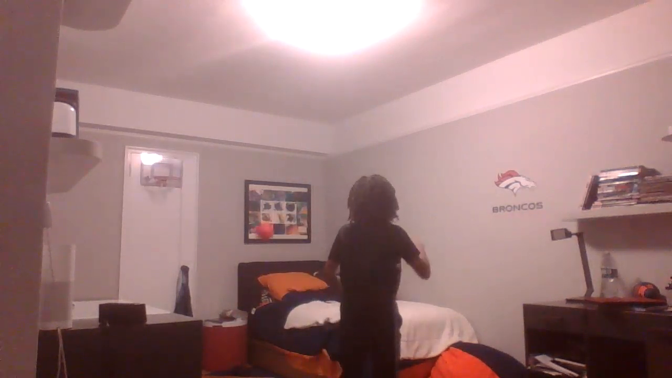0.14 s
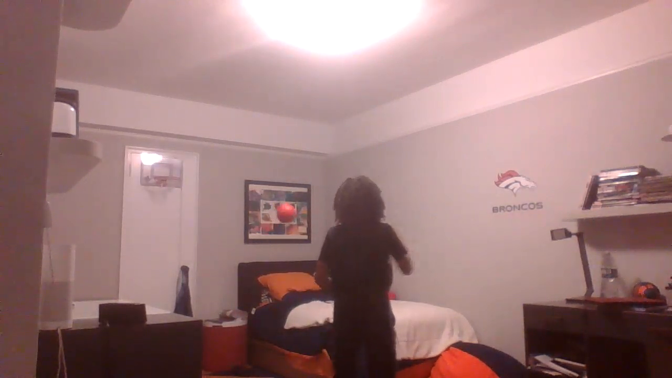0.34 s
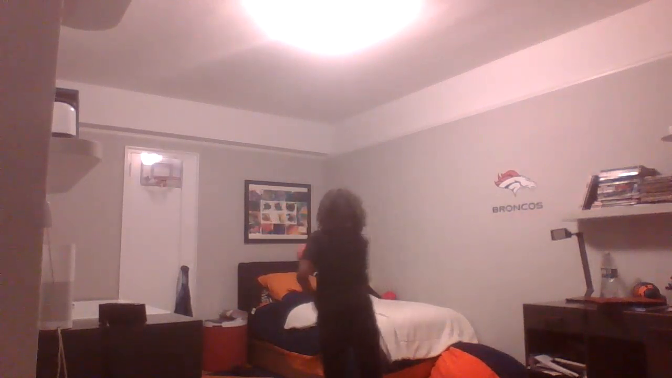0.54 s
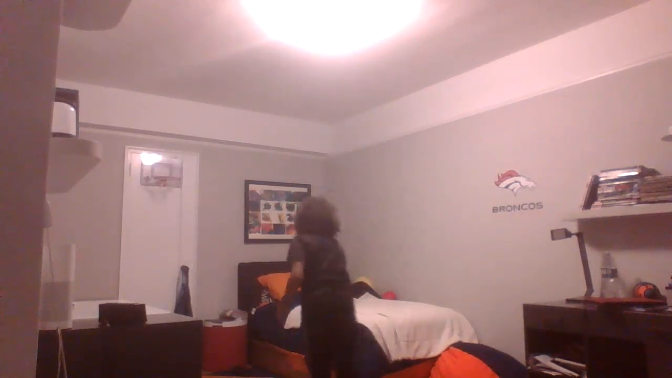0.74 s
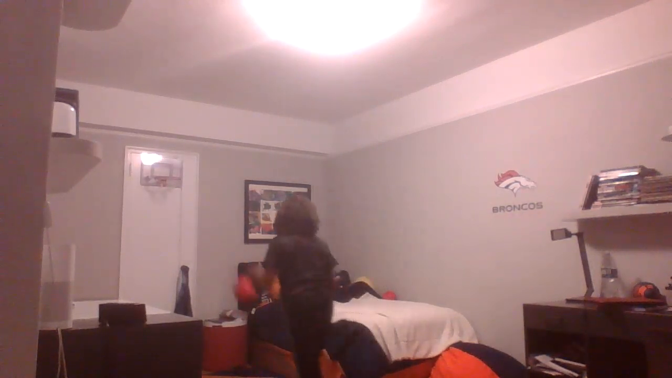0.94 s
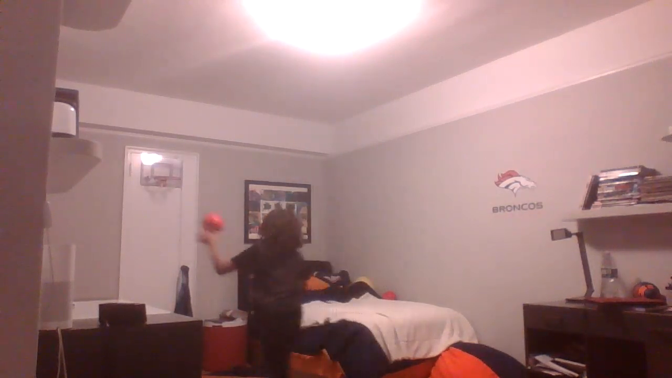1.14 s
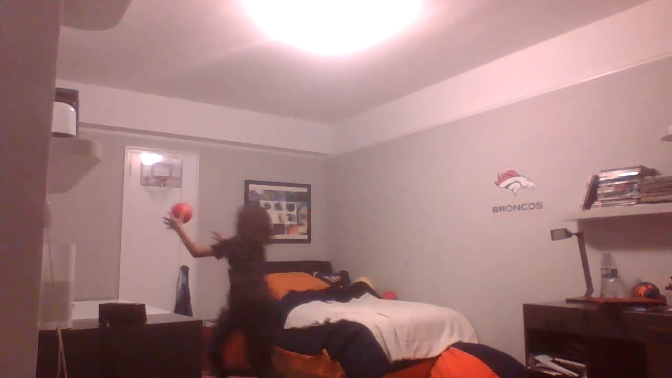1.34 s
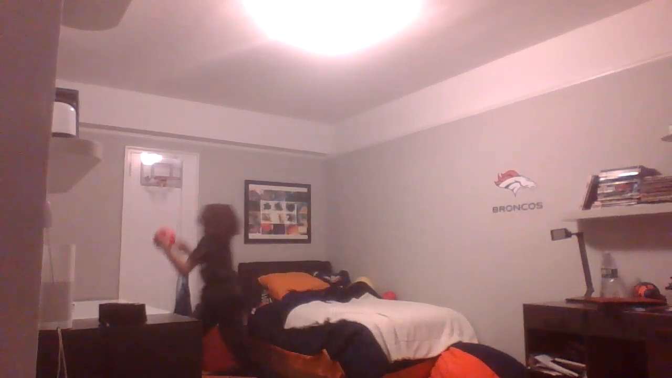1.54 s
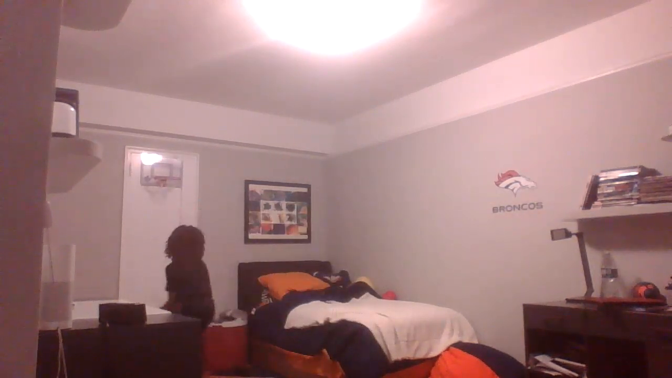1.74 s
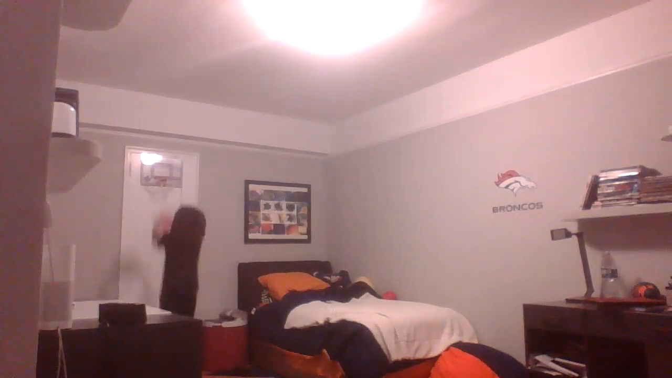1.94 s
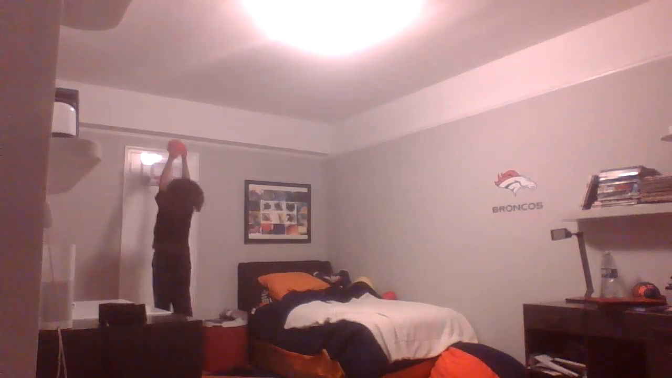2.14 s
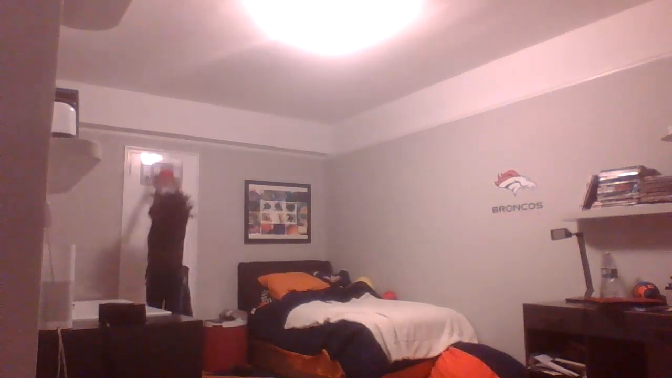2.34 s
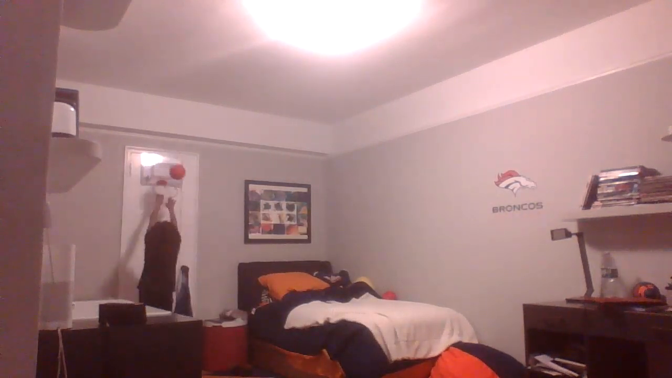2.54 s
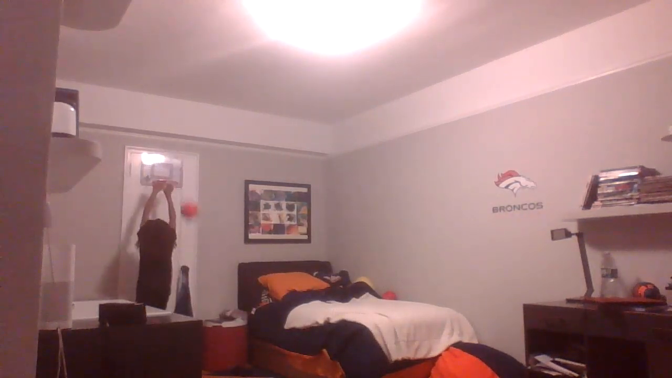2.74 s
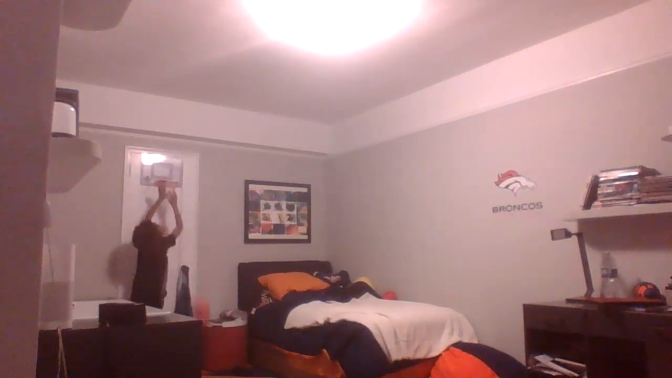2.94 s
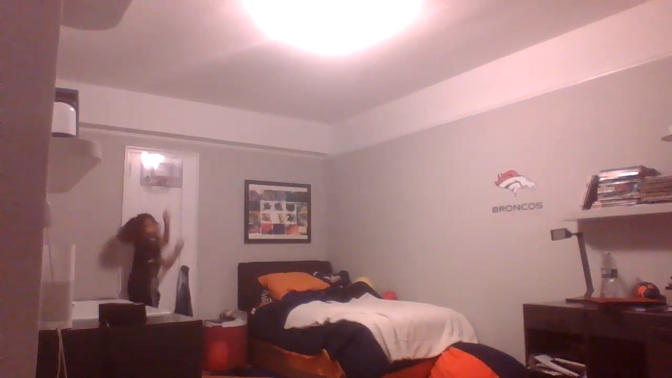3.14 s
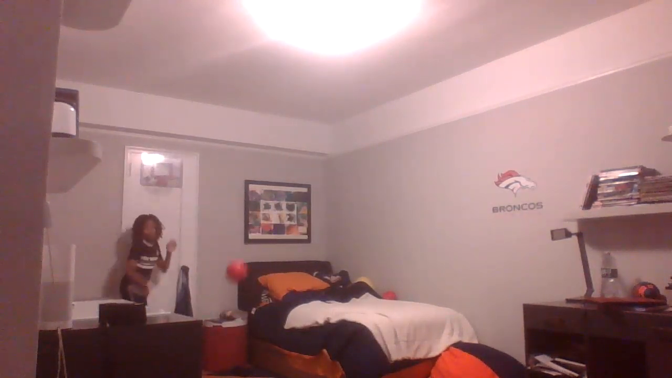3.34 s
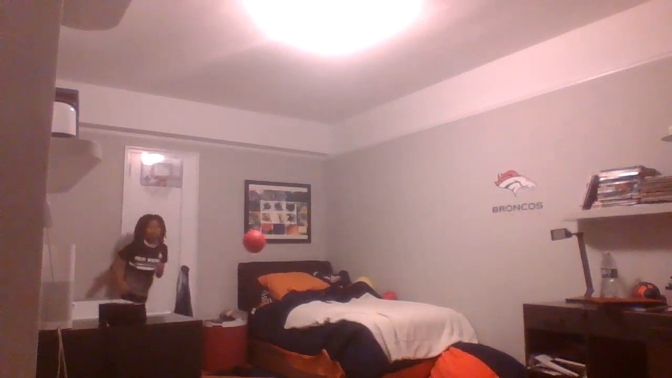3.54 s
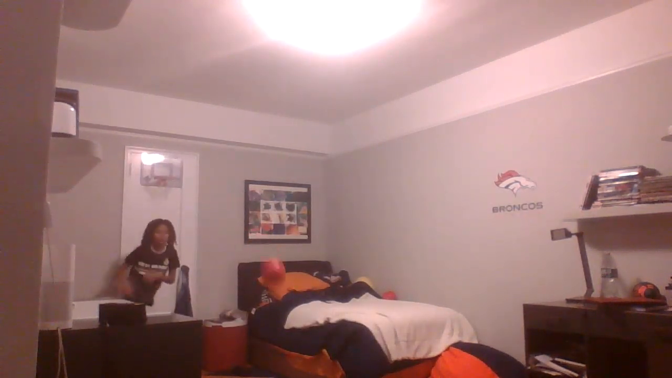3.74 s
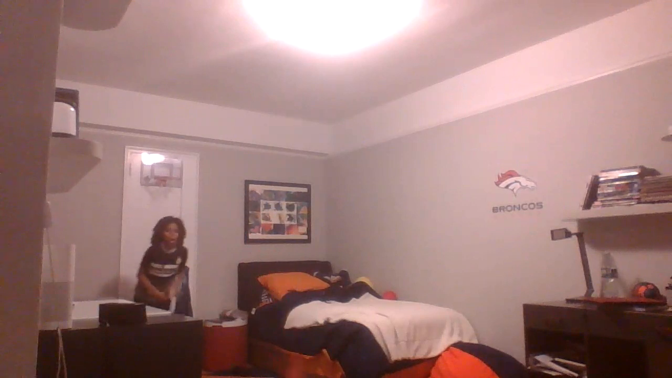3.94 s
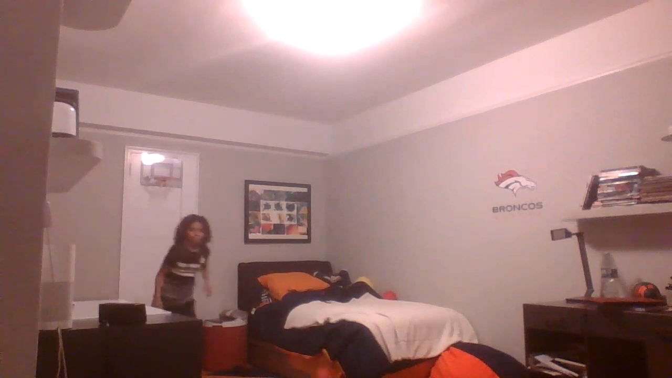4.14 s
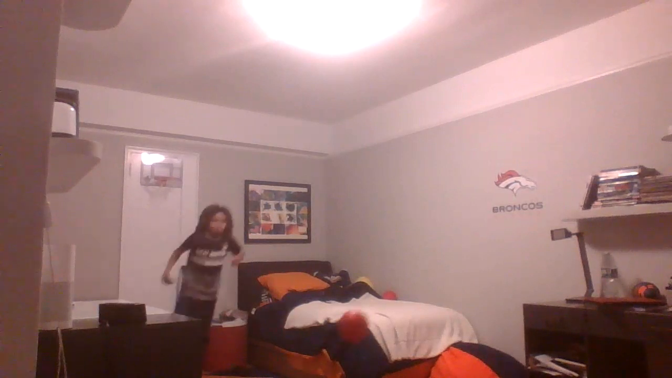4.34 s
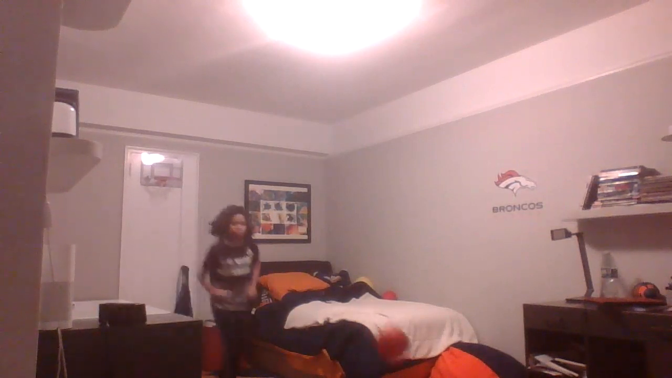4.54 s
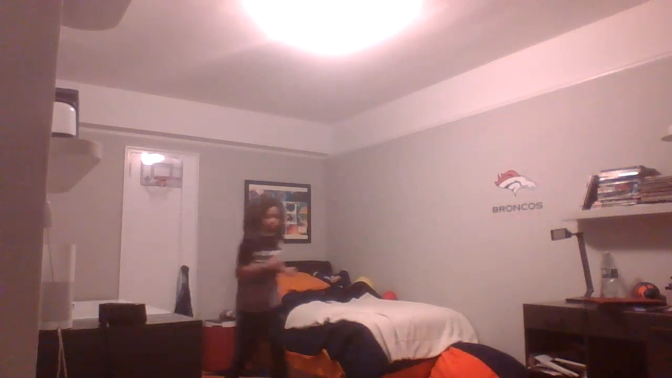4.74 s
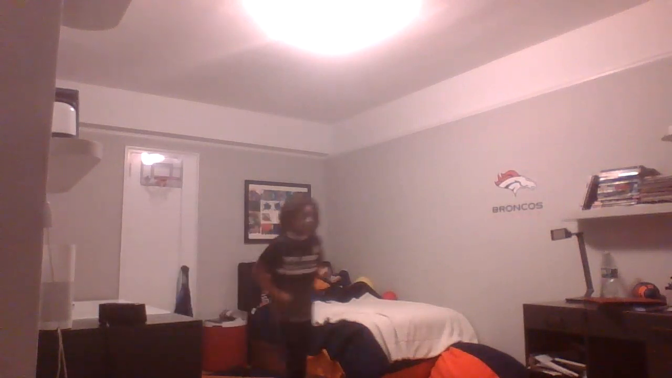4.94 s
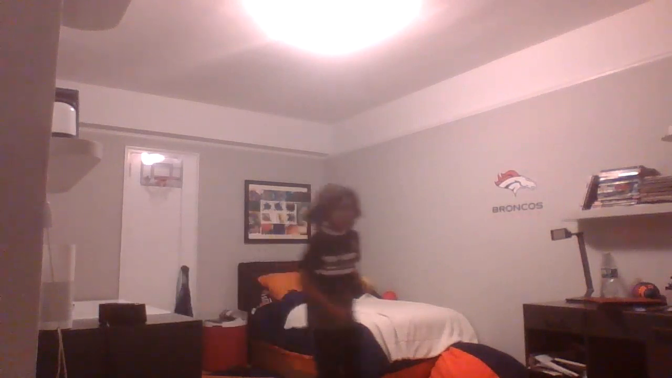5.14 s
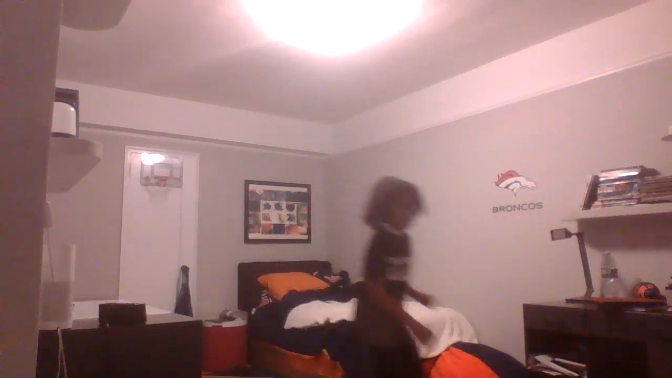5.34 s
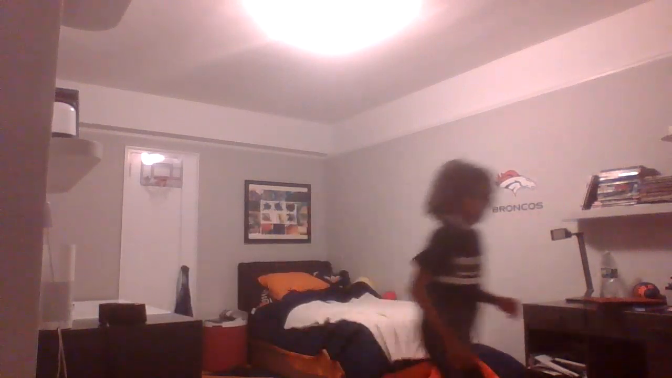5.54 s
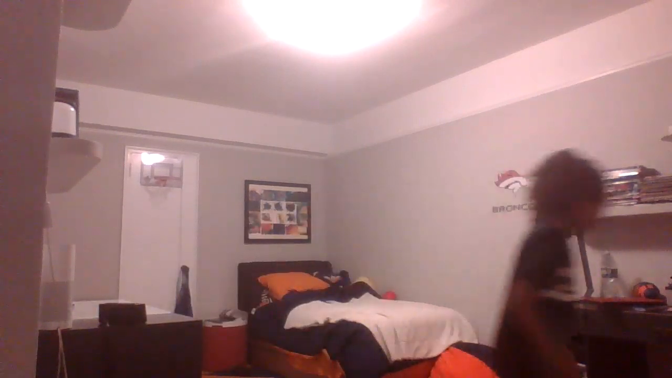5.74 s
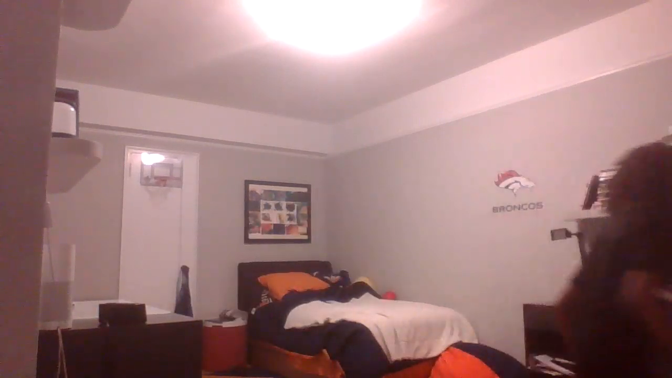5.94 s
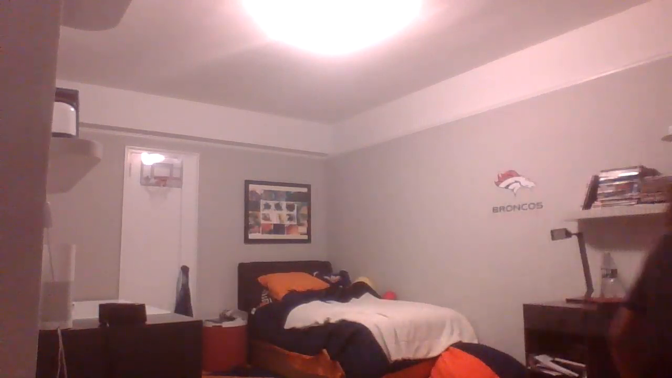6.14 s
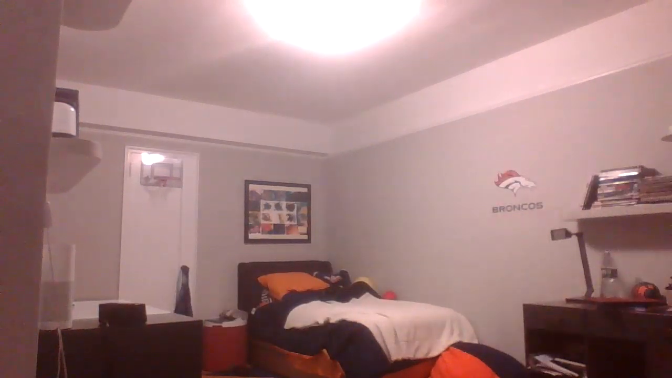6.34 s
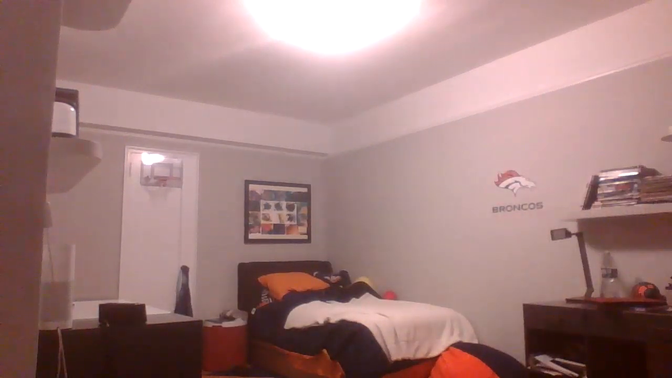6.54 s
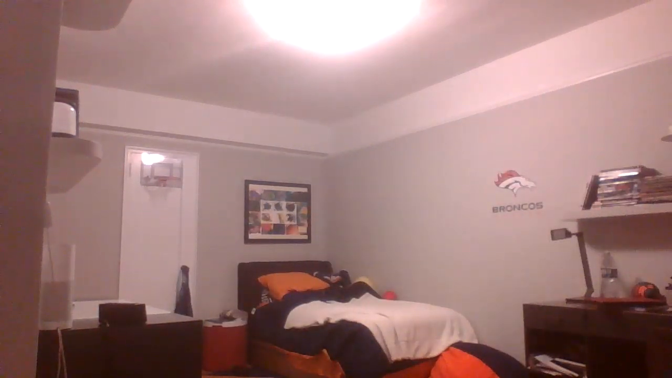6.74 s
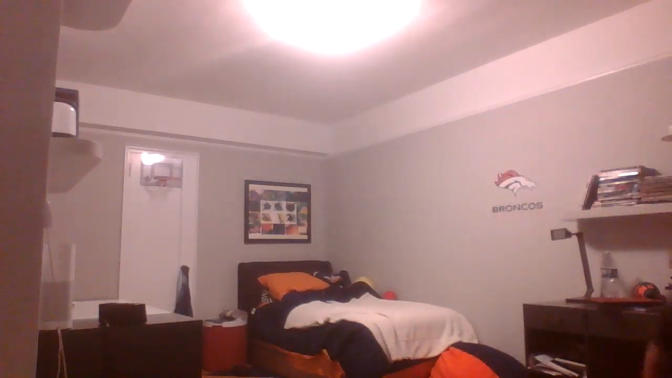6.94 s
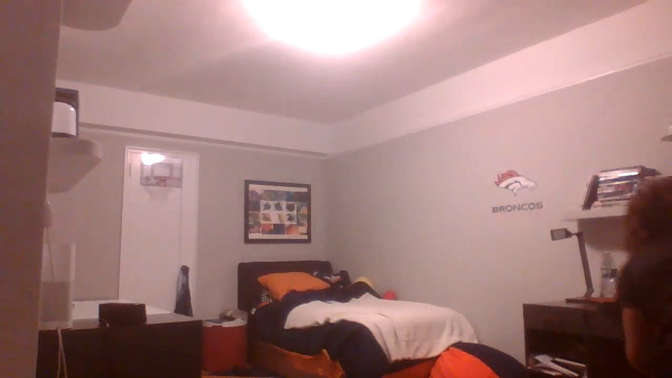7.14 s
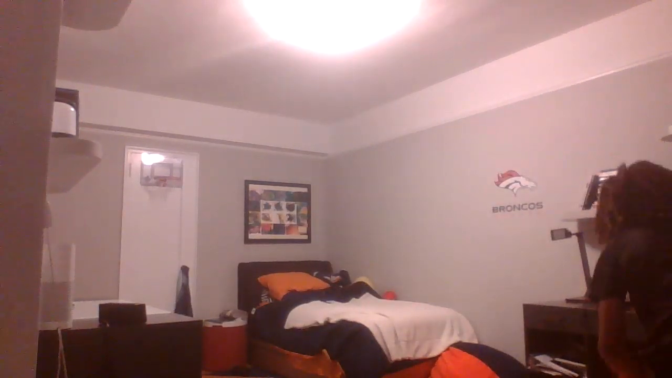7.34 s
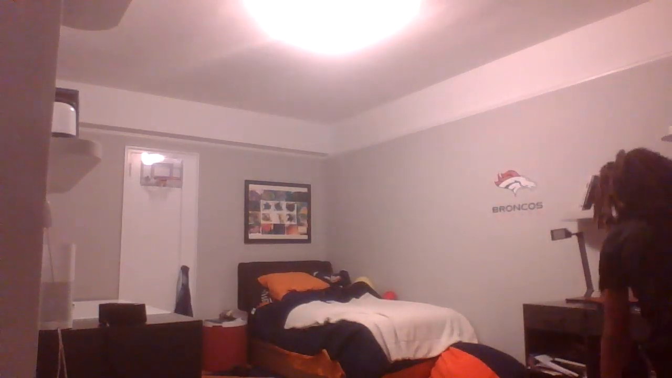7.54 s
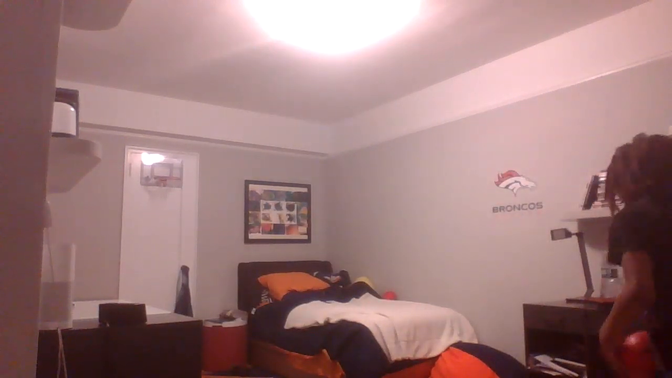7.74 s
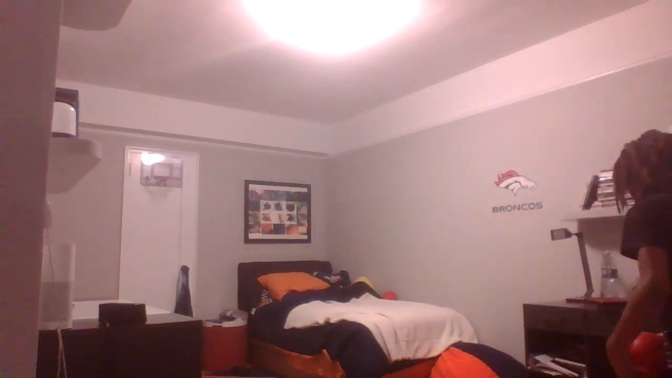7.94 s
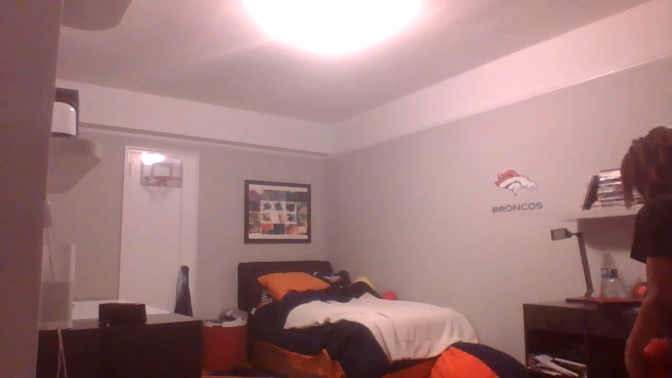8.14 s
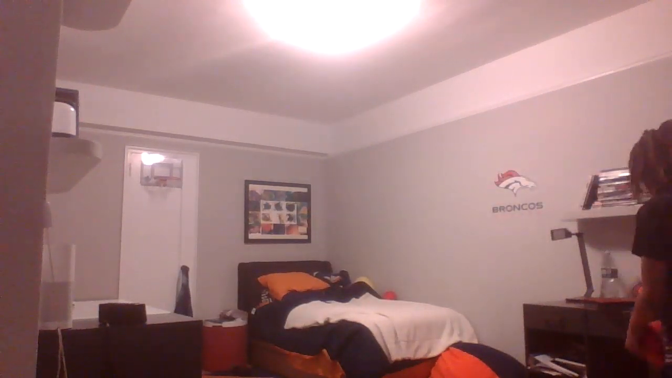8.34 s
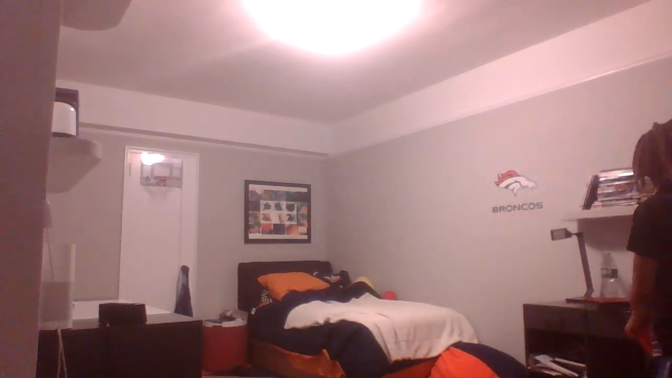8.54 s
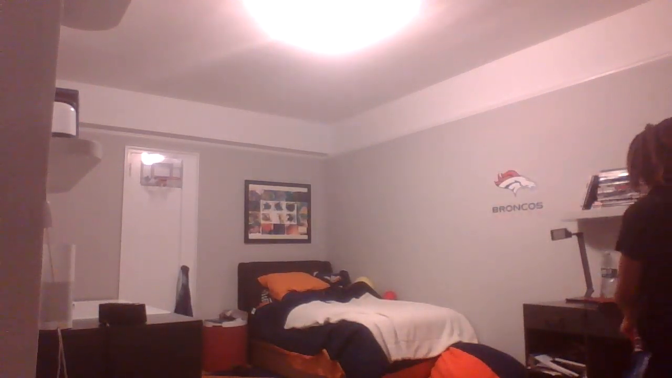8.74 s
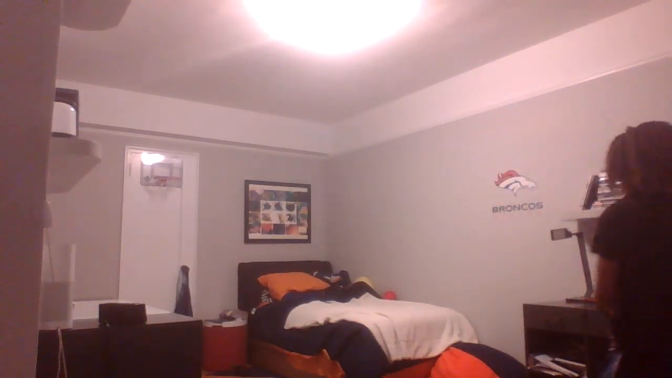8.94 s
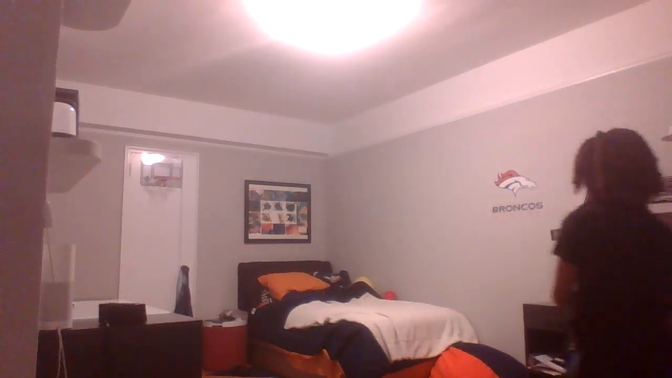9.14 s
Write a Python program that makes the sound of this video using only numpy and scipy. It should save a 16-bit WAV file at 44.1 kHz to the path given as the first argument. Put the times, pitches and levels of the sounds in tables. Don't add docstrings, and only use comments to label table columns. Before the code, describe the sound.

A fixed, modest room microphone picks up a child playing with a light ball and a door hoop. Early taps and a throw, thumping feet and swaying floorboards, then a dunk with wiry ringing and a shaking door. A quick rattle dies away, scattered thuds and small bounces continue, the loudest bounce lands close by, and the room settles into rumble and hiss with a last low floor bump.

```python
import sys
import numpy as np
from scipy import signal
from scipy.fft import rfft, irfft, next_fast_len
from scipy.io import wavfile
from scipy.ndimage import uniform_filter1d

SR = 44100
rng = np.random.default_rng(int(sys.argv[2]) if len(sys.argv) > 2 else 0)


def voltage_ratio(decibels):
    exponent = np.asarray(decibels, float) / 20
    return 10 ** exponent


def dump(signal):
    limited = np.clip(np.atleast_2d(signal).T, -1, 1)
    pcm = np.round(limited * 32767).astype(np.int16)
    wavfile.write(sys.argv[1], SR, pcm)


N = 406155

# (frequency [Hz], density [dB per Hz])
HUSH = [(8.8, -33), (15, -1.5), (28, -1), (87, -20), (166, -14), (204, -25), (243, -20), (423, -42),
        (462, -34.5), (881, -35), (1580, -39), (2600, -43), (15100, -48.5), (15900, -49.5)]

# (time [s], strength [dB], length [s])
SWAYS = [(.56, -26.5, 0.15), (.87, -21, 0.12), (1.21, -21, 0.094), (1.48, -27.5, 0.16), (1.69, -5, 0.1),
         (1.87, -20, 0.13), (2.08, -22.5, 0.25), (2.52, -7, 0.13), (2.9, -27, 0.21), (3.06, -26, .08),
         (3.21, -22, 0.083), (3.5, -25.5, 0.095), (3.75, -27.5, 0.19), (3.87, -23.5, 0.046),
         (4.22, -25.5, 0.15), (4.56, -28, 0.2), (4.91, -15.5, 0.058), (5.12, -26.5, 0.17),
         (5.41, -21.5, 0.14), (5.67, -17, 0.15), (6.08, -34, 0.16), (6.44, -33, 0.21), (6.75, -50, 0.12),
         (7.57, -28, 0.13), (9.13, -15.5, 0.029)]
HEELS = [(.01, -34, 0.09), (.88, -17.5, 0.091), (1.48, -41, 0.091), (1.64, -5, 0.041), (1.77, -20.5, 0.084),
         (1.91, -30, 0.098), (2.46, -21, 0.062), (2.56, -13, 0.094), (2.8, -35, 0.15), (3.01, -34.5, 0.078),
         (3.21, -15, 0.054), (3.36, -27, 0.16), (3.54, -39, .1), (3.82, -30.5, 0.065), (4.25, -17.5, 0.09),
         (4.67, -38, 0.15), (4.93, -20.5, 0.16), (5.41, -11, .09), (5.67, -19.5, 0.19), (6.19, -34, .09),
         (6.49, -30, 0.082), (6.67, -28, 0.044), (7.57, -16.5, 0.079), (9.13, -26.5, 0.091)]
BOARDS = [(.05, -36.5, 0.35), (.86, -25.5, 0.23), (1.48, -39, 0.083), (1.64, -17.5, .08),
          (1.86, -28.5, 0.19), (2.49, -11, 0.093), (2.6, -27, 0.11), (3.02, -34, .1), (3.21, -16, .06),
          (3.37, -36, 0.23), (4.13, -25, 0.1), (4.9, -23, 0.086), (5.41, -32.5, 0.15), (5.7, -52, 0.15),
          (6.16, -23, 0.073), (6.62, -33, 0.06), (7.62, -24, 0.14)]

# (time [s], effort [dB], nearness to the microphone [dB])
MOVING = [(0.0, -65, -12), (0.28, -63, -20), (0.8, -65, -13), (1.2, -65.5, -10), (1.8, -66.5, -9),
          (2.4, -67, -3.5), (3.0, -64.5, -17), (3.15, -54.5, -17), (3.4, -54.5, -17), (3.56, -62, -17),
          (4.54, -66.5, -12), (4.95, -58.5, -12), (5.5, -66, -9), (5.69, -63, -2), (6.38, -62, -11),
          (6.67, -61, -14), (7.4, -69, -8), (9.21, -74, -7)]
# (time [s], strength [dB], length [s])
SCUFFS = [(3.232, -57, .03), (3.325, -57, .03), (3.435, -57, .03), (4.21, -62, .08), (4.54, -65, .1),
          (4.73, -60, .08), (4.85, -61, .08), (5.115, -63, .07), (5.8, -62, .4), (6.585, -61, .04)]

# build (decay t60 [s], rise [s], spread of the cluster [0-1]),
# then hits (time [s], frequency [Hz], level [dB])
WIRE = (0.49, 0.0087, 0.0298)
WIRE_HITS = [(0.691, 1700, -56.5), (2.44, 1700, -44.5), (6.02, 1700, -61), (6.135, 1740, -66),
             (6.45, 1700, -59), (4.18, 2610, -68), (5.53, 2680, -55)]
BACKBOARD = (.4, .004, .3)
BACKBOARD_HITS = [(.832, 710, -32), (.832, 594, -33), (3.145, 600, -37), (3.2, 692, -33),
                  (4.103, 1090, -39), (4.105, 800, -38), (.835, 900, -41), (3.145, 908, -40),
                  (2.62, 1600, -62), (.513, 1000, -58), (7.526, 900, -41), (6.13, 700, -47),
                  (6.608, 720, -50)]
DOOR = (.55, 0.016, .04)
DOOR_HITS = [
    (2.46, 107.2, -19.5),
    (3.161, 103.4, -20),
    (3.3, 105, -29),
    (3.45, 103.4, -35.5),
    (7.531, 103.8, -20.5),
]
BOX = (0.18, 0.0049, 0.072)
BOX_HITS = [(3.0, 211, -39), (3.145, 302, -24), (5.385, 159.6, -24), (2.824, 1030, -55), (4.885, 890, -43),
            (5.53, 610, -39.5), (6.135, 794, -50), (6.608, 790, -57), (7.055, 730, -54), (7.055, 620, -56),
            (7.526, 2100, -44), (1.82, 240, -33), (.84, 285, -32), (7.53, 285, -32.5), (3.16, 370, -31),
            (2.5, 300, -29), (2.44, 234, -25), (2.565, 370, -40), (2.46, 380, -34), (3.85, 200, -43.5)]
SHELF = (0.54, 0.053, .1)
SHELF_HITS = [(3.45, 1280, -55), (3.8, 1286, -58), (3.78, 1150, -61), (3.839, 1200, -56.5)]
HOOK = (.5, .02, .03)
HOOK_HITS = [(3.09, 3550, -62), (3.125, 3950, -61)]
PANEL = (.22, .004, .12)
PANEL_HITS = [(.836, 760, -36), (.845, 1880, -51), (.89, 740, -41), (2.425, 550, -42), (2.46, 668, -45),
              (2.56, 1040, -51), (2.625, 1300, -56), (3.15, 850, -41), (3.152, 345, -33),
              (3.222, 1050, -46), (3.225, 700, -38), (3.29, 380, -42), (3.31, 720, -45), (3.355, 1080, -51),
              (3.41, 700, -49), (3.46, 480, -50), (4.105, 565, -39), (4.103, 1350, -46), (4.165, 1050, -48),
              (4.2, 1050, -50), (4.21, 2610, -59), (4.27, 1000, -57), (3.8, 400, -52), (5.53, 1780, -49),
              (5.53, 950, -48), (6.02, 700, -57), (6.135, 480, -52), (.69, 240, -46), (2.44, 280, -31),
              (7.555, 720, -43)]
BALL = (.05, .001, .1)
BALL_HITS = [(7.523, 2350, -35), (7.529, 900, -32), (7.531, 1800, -40), (7.531, 4700, -43),
             (7.553, 1050, -38)]
DULL = (.3, .004, .1)
DULL_HITS = [(.688, 235, -31), (.832, 245, -30), (3.146, 245, -28), (4.105, 245, -33), (4.105, 104, -27),
             (4.885, 245, -35), (2.52, 245, -32), (3.83, 240, -44), (3.63, 400, -52), (3.225, 500, -43),
             (6.61, 460, -49), (6.22, 500, -55), (3.73, 105, -44), (3.05, 800, -52), (4.883, 1150, -44)]

# (time [s], knock [dB], boom [dB], boom centre [Hz], slap [dB])
STEPS = [(1.478, -54, -50.5, 124, -69), (1.603, -49, -37.5, 175, -51.5), (1.628, -38.5, -21.5, 148, -52.5),
         (1.719, -42, -41, 110, -62), (1.815, -40.5, -31.5, 199, -48), (1.86, -44, -35.5, 193, -52),
         (1.902, -56, -47, 110, -65), (2.058, -49, -53, 110, -65), (2.149, -51, -58, 110, -78),
         (3, -46, -31.5, 176, -64), (3.104, -40, -38, 113, -52), (3.621, -44, -48, 200, -78),
         (3.977, -61, -48.5, 194, -75), (4.429, -54, -63, 132, -56), (4.529, -53.5, -51, 110, -57),
         (4.699, -57, -51.5, 146, -54), (5.086, -49.5, -44, 156, -51), (5.189, -68, -41.5, 139, -74),
         (5.26, -53, -38.5, 165.6, -46.5), (5.342, -51, -55, 162, -45), (5.739, -51, -36, 160, -52),
         (6.251, -57, -54, 124, -68), (6.487, -41, -36.5, 110, -69)]
TAPS = [(0.003, -36, -41.5, 136, -70), (0.514, -44.5, -42, 166, -73), (0.879, -25.5, -33, 120, -61),
        (2.619, -39, -36, 91, -57), (2.819, -50.5, -55, 114, -49), (3.827, -45, -50, 93, -58),
        (3.867, -42, -55, 91.5, -56), (4.175, -43, -31.5, 112, -53), (5.382, -37.5, -34, 156, -46.5),
        (6.017, -42.5, -37.5, 91.5, -46), (6.128, -35, -34, 93.4, -41.5), (6.159, -58, -47, 141, -55),
        (7.053, -46, -40.5, 140, -65), (7.833, -46, -51, 95.5, -57)]
RATTLES = [(3.214, -36, -49, 398, -48), (3.223, -27, -29.5, 377, -46), (3.261, -48, -32.5, 217, -44),
           (3.314, -31, -38.5, 388, -44), (3.353, -33.5, -35.5, 183, -47), (3.424, -34, -37.5, 377, -44),
           (3.461, -36, -38.5, 198, -44.5), (3.509, -37.5, -49, 287, -50), (3.545, -41.5, -64, 275, -64)]
DUNK = [
    (2.413, -34, -28.5, 211, -43.5),
    (2.423, -22.5, -21, 110, -35.5),
    (2.449, -23.5, -22, 152, -64),
]
THUDS = [
    (0.828, -15, -18, 122, -32.5),
    (3.141, -21, -20.5, 103, -48),
    (4.102, -18.5, -27, 102, -39.5),
]
BOUNCES = [
    (0.686, -25, -33, 247, -40),
]
NEAR = [
    (4.88, -25, -22, 102, -32),
    (5.522, -27, -23, 125, -36),
    (6.448, -40, -34, 145, -47),
    (6.605, -39, -29, 143, -50),
    (7.523, -18.5, -12, 130, -27),
]

# (frequency [Hz], level [dB], decay t60 [s])
BOOM = [(61.9, 9.5, 0.66), (77.6, 3, 0.51), (102, 0.5, 0.56), (110, 1, 0.39), (124, -3, 0.68),
        (139.54, 3, 0.43), (156, 3.5, 0.4), (187.8, -6, 0.45), (218.5, 1, 0.35), (263.5, 4.5, 0.23),
        (312.5, -8.5, 0.17), (349, 0, 0.23), (401.4, 0.5, 0.2)]
# (frequency [Hz], width [Hz], height above the smooth tail [dB])
BODY = [(610, 120, 1), (691, 19, 4.5), (920, 150, 0), (1140, 22, 1.5), (1355, 110, 0.5), (1700, 15, 2.5),
        (468, 35, -8)]
# (band centre [Hz], decay t60 [s])
ROOM = [(330, 0.46), (800, 0.52), (1700, 0.54), (3500, 0.5), (7000, 0.44), (13000, 0.32)]
# (delay [s], level [dB])
ECHOES = [(0, 1.5), (.0075, -8.5), (.012, -13), (.031, -10)]
# (frequency [Hz], gain [dB])
MIC = [(6000, -1), (11000, -4), (15000, 5), (16300, 0), (16900, -32)]


def evened(x):
    return x / np.sqrt(np.mean(x ** 2) + 1e-20)


def read(points, hz):
    f, value = np.transpose(points)
    return np.interp(np.log(hz + 1), np.log(f + 1), value)


def curve(rows, column):
    rows = np.array(rows)
    return voltage_ratio(np.interp(np.arange(N) / SR, rows[:, 0], rows[:, column]))


def band(x, lo_hz, hi_hz):
    sos = signal.butter(2, [lo_hz, hi_hz], "band", fs=SR, output="sos")
    return evened(signal.sosfilt(sos, x))


def add(mix, s, sound):
    part = mix[max(round(s * SR), 0):][:len(sound)]
    part += sound[:len(part)]


def clumped(spread_db, smooth):
    drift = evened(uniform_filter1d(rng.standard_normal(N), smooth))
    return rng.standard_normal(N) * voltage_ratio(spread_db * drift)


def wobble(lo_hz, hi_hz):
    noise = rng.standard_normal(next_fast_len(N + SR))
    z = signal.hilbert(band(band(noise, lo_hz, hi_hz), lo_hz, hi_hz))
    level = evened(z.real / (abs(z) + 0.29))
    return level[SR // 2:][:N]


def pushes(rows, rest_db, stretch=1):
    rise_share, fall_db = 0.52, 15.5
    t = np.arange(0, N / SR + .01, .002)
    s, db, length = np.transpose(rows)[:, :, None]
    away = np.where(t < s, (s - t) / rise_share, (t - s) / stretch) / length
    gain = voltage_ratio(rest_db) + voltage_ratio(db - fall_db * away).sum(0)
    return np.interp(np.arange(N) / SR, t, gain)


def hush():
    size = next_fast_len(N)
    hz = np.fft.rfftfreq(size, 1 / SR)
    spectrum = rfft(rng.standard_normal(size)) * voltage_ratio(read(HUSH, hz))
    return voltage_ratio(-50) * evened(irfft(spectrum, size)[:N])


def joists():
    sway = wobble(7.8, 23.9) * uniform_filter1d(pushes(SWAYS, -51), 900)
    thud = wobble(31.3, 46.6) * uniform_filter1d(pushes(HEELS, -51), 600)
    board = wobble(55.3, 80.7) * uniform_filter1d(pushes(BOARDS, -53.5), 400)
    return voltage_ratio(-1.5) * (sway + thud + voltage_ratio(-2.0) * board)


def rustle():
    grains = clumped(1.93, 500)
    effort = curve(MOVING, 1)
    scrape = band(grains, 540, 3270) * effort
    swish = band(grains, 13500, 16000) * effort * curve(MOVING, 2)
    shuffle = voltage_ratio(8) * effort
    after = voltage_ratio(-18) * pushes(BOARDS, -59, stretch=1.23)
    grumble = band(band(grains, 120, 343), 120, 343) * (shuffle + after)
    return voltage_ratio(-4) * (scrape + swish + grumble)


def scuffs():
    return band(clumped(3.0, 150), 1800, 3800) * pushes(SCUFFS, -95)


def rings(part, hits):
    t60, rise, spread = part
    t, out = np.arange(0, min(t60, .43), 1 / SR), np.zeros(N)
    for s, hz, db in hits:
        detune, phase = rng.random((2, 12, 1))
        mode_hz = hz * (1 + spread * (detune - .5))
        cluster = np.sin(2 * np.pi * (mode_hz * t + phase)).sum(0)
        add(out, s, cluster * voltage_ratio(db - 4 - 60 * t / t60) * (1 - np.exp(-t / rise)))
    return out


def furniture():
    return rings(BOX, BOX_HITS) + rings(SHELF, SHELF_HITS) + rings(DULL, DULL_HITS)


def door_and_hoop():
    door = rings(DOOR, DOOR_HITS) + rings(PANEL, PANEL_HITS)
    hoop = rings(HOOK, HOOK_HITS) + rings(WIRE, WIRE_HITS) + rings(BACKBOARD, BACKBOARD_HITS)
    return door + hoop


def boom(t, centre_hz, rise, spread, scatter_db):
    hz, db, t60 = np.transpose(BOOM)[:, :, None]
    luck = rng.random((2, len(BOOM), 1)) - .5
    db = db - 10 * (np.log2(hz / centre_hz) / spread) ** 2 + scatter_db * luck[0]
    turns = hz * t + .5 + 0.39 * luck[1]
    ring = (voltage_ratio(db - 60 * t / t60) * np.sin(2 * np.pi * turns)).sum(0)
    ring = ring * (1 - np.exp(-t / rise))
    return ring / np.sqrt(np.mean(ring[:SR // 30] ** 2))


def knock(t, levels_db, rise, click_db, damping, slap_hz, air_hz):
    knock_db, slap_db, air_db, belly_db = levels_db
    crack_share, crack_s = .12, 0.0005
    hz = np.fft.rfftfreq(len(t), 1 / SR)
    taps = rng.standard_normal(len(t)) * (1 - np.exp(-t / rise))
    for delay, db in ECHOES:
        crack = crack_share * rng.standard_normal(200) * np.exp(-t[:200] / crack_s)
        crack[0] = -1 if delay == 0 else -crack_share
        add(taps, delay + .0004, voltage_ratio(click_db + db) * crack)
    colour = sum(db / (1 + ((hz - f) / w) ** 2) for f, w, db in BODY) + read(MIC, hz)
    spot = evened(uniform_filter1d(rng.standard_normal(len(hz)), size=60))
    colour += 2.5 / (1 + (hz / 1800) ** 2) * spot
    density = [(250, knock_db + belly_db), (750, knock_db), (1250, knock_db - 6.0), (slap_hz, slap_db - 3.0),
               (air_hz, air_db - 3), (1.85 * air_hz, air_db - 16)]
    z = rfft(taps) * voltage_ratio(read(density, hz) + colour + 4.5)
    centres, out = np.transpose(ROOM)[0], 0
    for k, (f, t60) in enumerate(ROOM):
        share = read(np.transpose([centres, np.arange(len(ROOM)) == k]), hz) * (hz > 280)
        decay = voltage_ratio(-60 * t / (t60 * damping ** (k / 3)))
        out = out + irfft(z * share, len(t)) * decay
    return out * (1 - np.exp(-t / min(rise, .004) * 4))


def blows(rows, rise, boom_rise, spread, click_db, damping, boom_trim_db, air_db,
          belly_db=6, lag=0, slap_hz=3300, air_hz=12000):
    t, out = np.arange(22000) / SR, np.zeros(N)
    for s, knock_db, boom_db, boom_hz, slap_db in rows:
        low = voltage_ratio(boom_db + boom_trim_db) * boom(t, boom_hz, boom_rise, spread, 18.4)
        levels_db = knock_db, slap_db, slap_db + air_db, belly_db
        add(out, s + lag, low + knock(t, levels_db, rise, click_db, damping, slap_hz, air_hz))
    return out


def feet():
    return blows(STEPS, 0.0069, 0.011, spread=0.59, click_db=-17, damping=1.0, boom_trim_db=-0.5, air_db=-16.5)


def hoop_blows():
    dunk = blows(DUNK, 0.0025, 0.0098, spread=0.68, click_db=-19, damping=0.87,
                 boom_trim_db=0.5, air_db=-7.5)
    rim = blows(RATTLES, 0.0013, 0.006, spread=0.47, click_db=19, damping=.35,
                boom_trim_db=-2.5, air_db=-16)
    return dunk + rim


def ball_blows():
    taps = blows(TAPS, 0.0011, 0.0042, spread=0.67, click_db=21, damping=0.81,
                 boom_trim_db=-0.5, air_db=-18)
    wood = blows(THUDS, 0.0012, 0.0016, spread=0.8, click_db=18, damping=0.67,
                 boom_trim_db=2.0, air_db=-29.5, belly_db=8.0, slap_hz=2370, air_hz=5500)
    hand = blows(BOUNCES, 0.0025, 0.0015, spread=0.97, click_db=23, damping=0.8,
                 boom_trim_db=-1.5, air_db=0.0)
    near = blows(NEAR, 0.0034, 0.003, spread=0.86, click_db=33, damping=0.85,
                 boom_trim_db=-3.0, air_db=-8.5, belly_db=2.5, lag=0.00151)
    return taps + wood + hand + near + rings(BALL, BALL_HITS)


def scene():
    background = hush() + joists()
    player = rustle() + scuffs() + feet()
    ringing = furniture() + door_and_hoop()
    return (background + player + ringing + hoop_blows() + ball_blows())[None]


def top_cut(x):
    return signal.sosfilt(signal.butter(12, 16860, fs=SR, output="sos"), x)


def record(dry):
    size = next_fast_len(N)
    above = np.fft.rfftfreq(size, 1 / SR) > 15800
    top = irfft(rfft(dry, size) * above, size)[:, :N]
    power = uniform_filter1d(top ** 2, size=400)
    loud = power > voltage_ratio(2 * -70) + 2 * np.roll(power, 600, axis=1)
    gate = uniform_filter1d(1. * loud, size=200)
    return top_cut(dry - top * (1 - gate))


dry = scene()
out = record(dry)
dump(out)
```